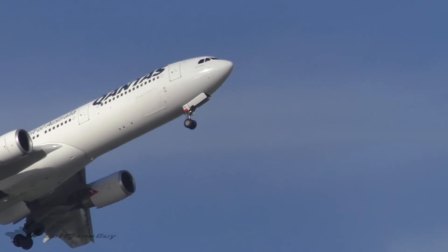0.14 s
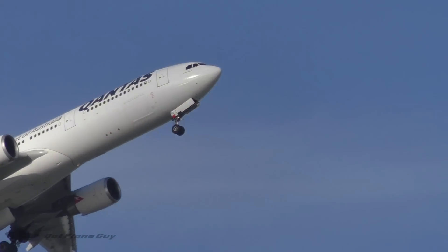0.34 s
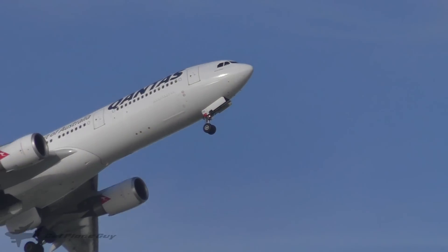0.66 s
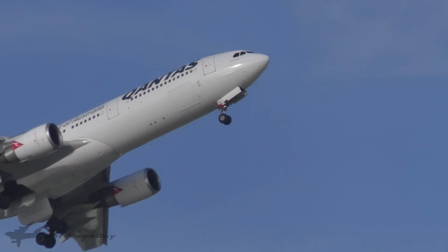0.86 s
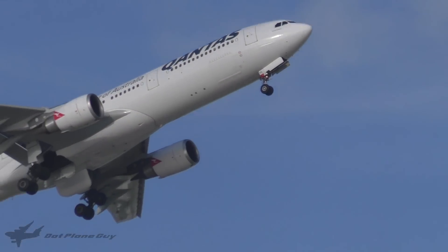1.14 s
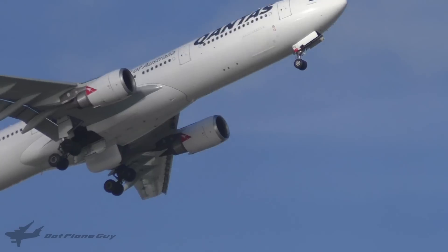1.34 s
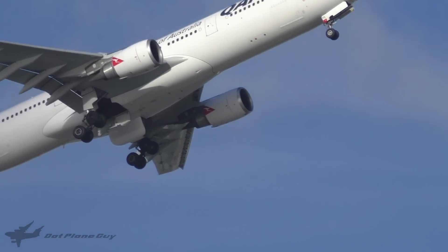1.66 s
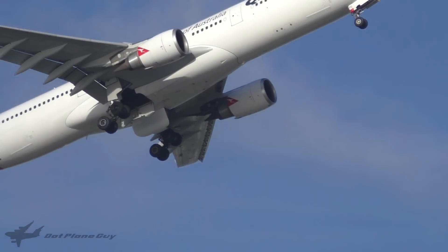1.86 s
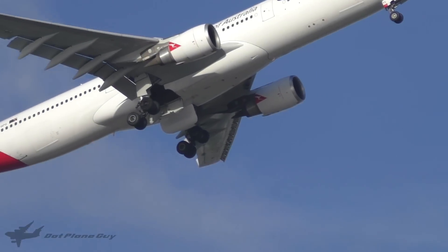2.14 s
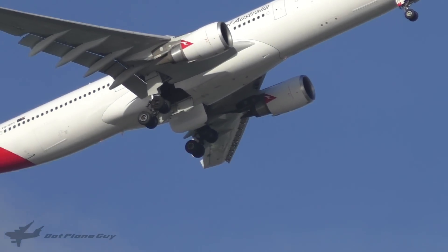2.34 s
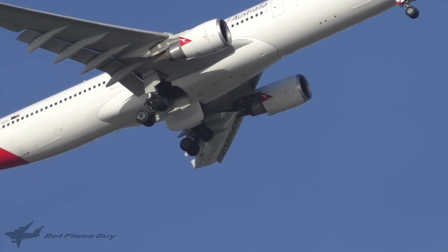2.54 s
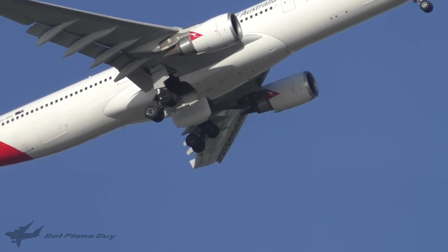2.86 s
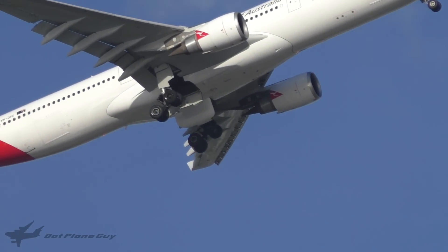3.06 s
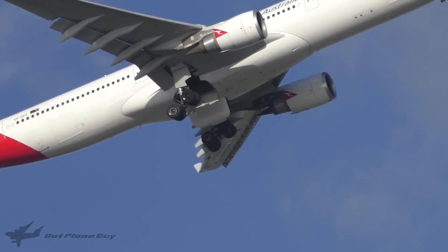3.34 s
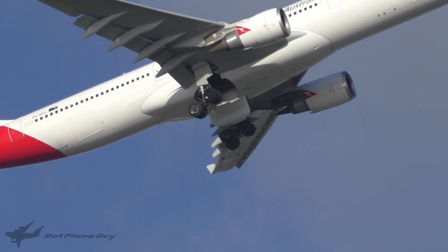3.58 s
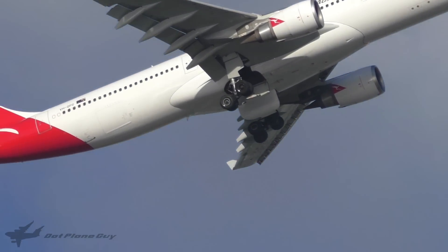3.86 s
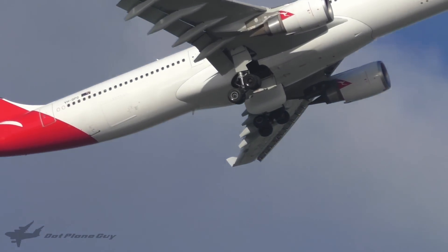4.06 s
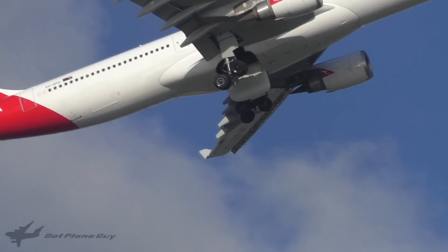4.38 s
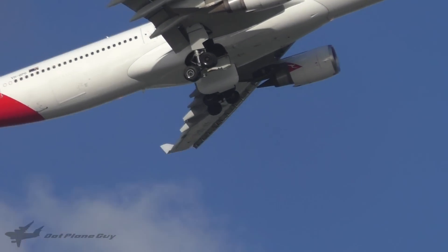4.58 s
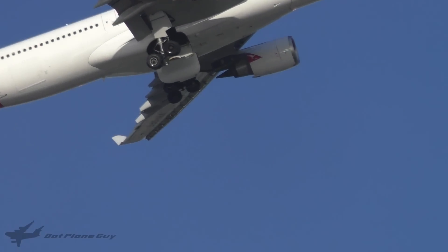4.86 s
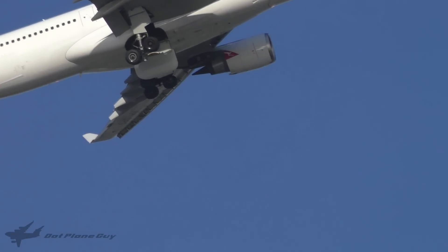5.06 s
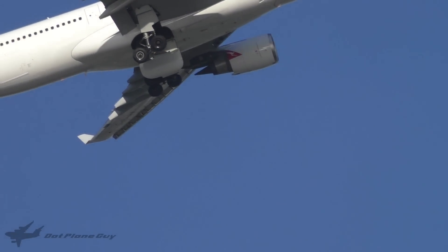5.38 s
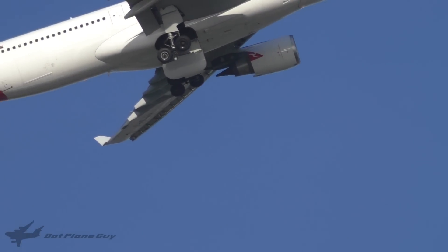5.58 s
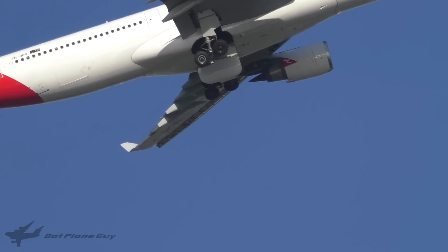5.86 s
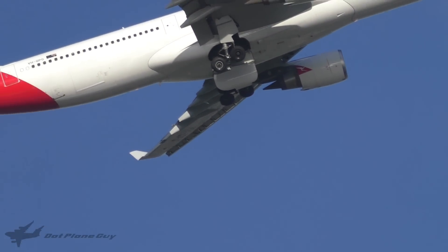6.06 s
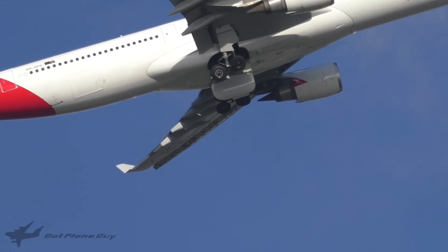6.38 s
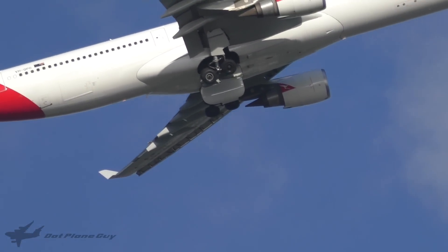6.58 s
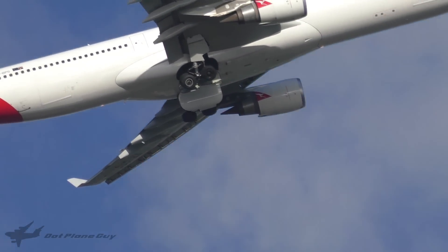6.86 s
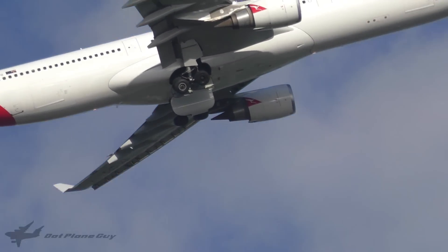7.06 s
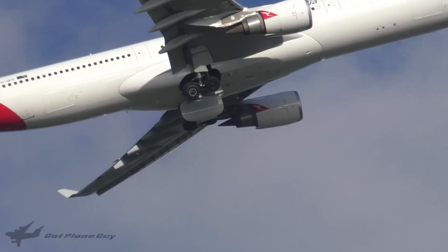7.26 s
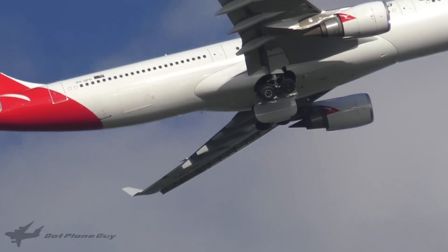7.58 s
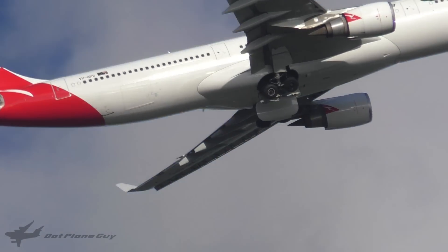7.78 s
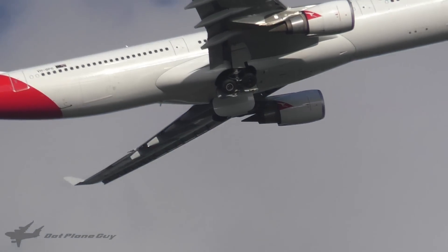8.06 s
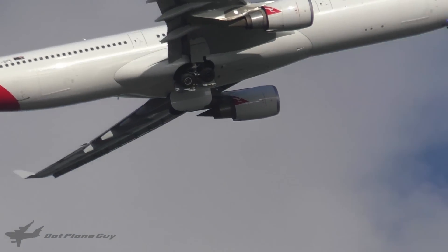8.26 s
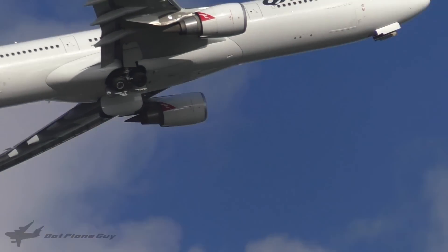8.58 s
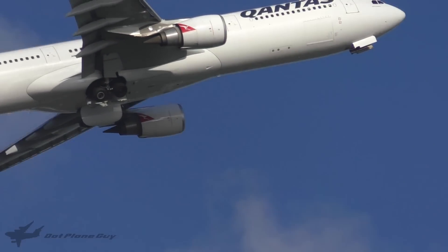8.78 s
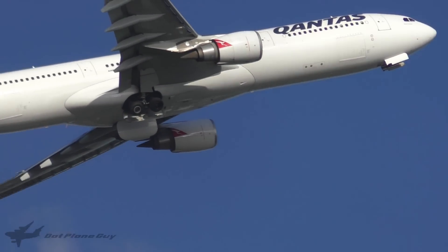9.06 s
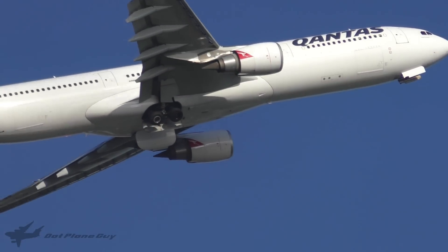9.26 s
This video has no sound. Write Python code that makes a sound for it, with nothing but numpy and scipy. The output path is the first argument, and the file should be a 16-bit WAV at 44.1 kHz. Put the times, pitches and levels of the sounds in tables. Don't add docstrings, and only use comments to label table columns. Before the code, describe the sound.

From 0 seconds a large twin-engined jet is already loud, climbing past a microphone on open ground. A deep, uneven drone around 100 hertz sits under a broad, dull exhaust roar. A thin fan whine near 2.4 kilohertz flickers through gusty air, bright around 0.5 seconds. The roar's body sags near 0.9 and more deeply near 2.2, while low rumbling heaves around 2.3 to 3. Very faint handling ticks occur before 3. From 2 to 5 the bass fills in, the drone recedes and the air clears, with a short heave at 3.5 and a whine glint at 4.8. From 6 to 8 hiss surges in patches and the whine, now sinking toward 2.1 kilohertz, flashes often, strongest around 7.1 and 7.6. A faint octave emerges after 7.5. The ground-reflected roar continues, brighter and open, to about 9.4 without stopping.

```python
import sys
import numpy as np
from scipy import signal
from scipy.fft import irfft, next_fast_len
from scipy.io import wavfile

SR = 44100
rng = np.random.default_rng(int(sys.argv[2]) if len(sys.argv) > 2 else 0)


def volts_from_decibels(level):
    exponent = np.asarray(level, float) / 20
    return 10 ** exponent


def generate_wav(sig):
    pcm = np.round(np.clip(np.atleast_2d(sig).T, -1, 1) * 32767).astype(np.int16)
    wavfile.write(sys.argv[1], SR, pcm)


N = 415863
SIZE = next_fast_len(N)

# frequency in Hz, density in dB per Hz.
EXHAUST_SPECTRUM = [(65, -33), (110, -3.5), (170, -0.5), (240, 1), (340, -3), (520, -7), (700, -11.5),
                    (1000, -13), (1500, -17), (2400, -23.5), (3550, -29.5), (3950, -38.5), (6000, -55),
                    (8400, -81.5)]
# peak time in seconds, length in seconds, lift in dB.
BODY_LULLS = [
    (.3, 0.36, 1.5),
    (.85, 0.81, -4.5),
    (1.6, .5, 0.5),
    (2.15, .75, -7),
    (3.55, 0.24, 4.5),
    (4.72, .45, -3),
    (5.62, 0.27, 2.5),
    (5.85, 0.33, -2),
]
# peak time in seconds, length in seconds, middle lift in dB, treble lift in dB.
CLEAR_AIR = [(0.06, 0.52, 6.5, 1.5), (0.55, 0.68, 5.5, 1), (0.95, 0.33, -1, 2.5), (1.22, 1.03, 4.5, 4.5),
             (1.63, 0.32, 6, 3.5), (2.57, 0.26, 3.5, 2.5), (2.59, 0.62, 5, 6.5), (2.92, 0.45, 3, 4),
             (3.31, 0.84, 2, 6.5), (3.75, 0.26, -1, 3.5), (3.79, 0.85, 6.5, 3), (4.29, 0.37, 3, 3.5),
             (4.56, 0.46, 4, 0), (4.68, 0.26, 2, 5.5), (4.85, 0.2, 7.5, 4.5), (5.0, 0.4, 6.5, 3.5),
             (5.17, 0.3, 3.5, 4.5), (5.58, 0.26, 5.5, 5.5), (5.81, 0.56, 7, 8.5), (6.24, 0.75, 3.5, 4),
             (6.84, 0.75, -0.5, 4.5), (7.02, 1.0, 6, -1.5), (7.12, 0.36, 1.5, 8), (7.53, 0.48, 2.5, 10.5),
             (7.69, 0.37, 3, -1), (7.93, 0.33, 0.5, 8), (8.2, 0.22, 0, 7), (8.56, 0.36, 7.5, 6.5),
             (8.79, 0.4, 4.5, 6.5), (9.22, 0.83, 3, 5.5)]
# time in seconds, slope above the treble in dB per octave.
AIR_SLOPE = [(0, -7.5), (2.3, -5), (3, -3), (4.5, 1.5), (9.43, 3)]
# time in seconds, frequency in Hz.
BLADE_TONE = [(0, 2448), (.6, 2472), (1.2, 2460), (1.6, 2445), (2.45, 2420), (3.3, 2384), (4.8, 2310),
              (5.8, 2248), (6.9, 2188), (7.5, 2165), (8, 2142), (8.6, 2105), (9.43, 2076)]
# time in seconds, level in dB re the tone.
BLADE_OCTAVE = [(0, -37), (7.2, -35), (7.6, -18), (8, -25), (8.7, -15), (9.0, -15.5), (9.43, -22)]
# peak time in seconds, length in seconds, lift in dB.
TONE_GLINTS = [(.13, .25, 13), (.28, .2, 9), (.43, .2, 12), (.56, .18, 18), (1.08, .2, 9), (1.2, .2, 14),
               (1.33, .2, 12.5), (1.61, 0.24, 14.5), (2.1, .5, 4), (2.46, 0.38, 17.5), (2.65, .2, 11.5),
               (2.95, 0.5, 10), (3.27, .2, 7), (3.7, .25, 12.5), (3.95, .35, 10), (4.6, .3, 9),
               (4.81, .17, 18), (5.75, .4, 14), (6.3, .3, 6.5), (6.62, .2, 11), (6.86, 0.38, 15.5),
               (7.12, 0.45, 19.5), (7.33, .15, 11), (7.45, .2, 14), (7.57, .2, 20.5), (7.92, 0.25, 18.5),
               (8.05, 0.15, 15), (8.56, 0.28, 15), (8.78, .36, 11.5), (9.35, .2, 10)]
# time in seconds, extra path in ms, strength 0-1, share of treble kept 0-1.
GROUND_BOUNCE = [(0, 1.77, 0.39, 0), (1, 2.04, 0.25, 0), (1.8, 2.52, 0.26, 0), (2.5, 2.3, 0.12, 0.06),
                 (3.7, 2.56, 0.17, 0), (4.2, 2.96, 0.3, 0), (5.2, 3.1, 0.25, 0.2), (6.3, 3.5, 0.34, 0.7),
                 (7.2, 3.6, 0.27, 0.75), (7.9, 4, 0.34, 0.9), (9.43, 4.24, 0.45, 0.6)]
# time in seconds, centre in Hz, level in dB.
DRONE_COURSE = [(0, 102, -21), (.25, 101, -16.5), (.7, 98, -24), (1.1, 97, -18), (1.5, 95, -18),
                (1.9, 93, -22.5), (2.15, 85, -23.5), (2.45, 80, -16.5), (2.72, 82, -30), (2.95, 85, -21.5),
                (3.42, 89, -18.5), (3.62, 86, -29.5), (4.6, 70, -30.5), (5.6, 75, -38.5), (6.5, 78, -25.5),
                (7.9, 80, -32), (8.45, 82, -27), (9.43, 85, -33.5)]
# frequency in Hz, density in dB per Hz.
SWELL_SPECTRUM = [(14, -20.5), (25, -6), (40, -3.5), (60, 2), (100, -2.5), (150, -8), (220, -33.5)]
# peak time in seconds, length in seconds, lift in dB.
EDDY_BILLOWS = [
    (.3, .35, 5),
    (1.2, 0.81, 3),
    (2.3, .7, 5),
    (2.95, 0.55, 7.5),
    (3.85, 0.97, -3),
    (4.68, .5, 5.5),
    (5.03, 0.27, 3),
    (6.4, .9, 2),
    (8.55, .45, -1.5),
]
# time in seconds, peak in dB, frequency in Hz.
HANDLING_TICKS = [(.325, -61, 6200), (.335, -78, 7900), (.855, -72, 7800), (.92, -65, 8000),
                  (.92, -69, 11800), (1.325, -73, 8060), (1.325, -75, 11700), (1.854, -70, 11900),
                  (2.117, -74, 8000), (2.245, -70, 8200), (2.245, -76, 10300), (2.245, -78, 13000),
                  (2.82, -71, 11200), (2.83, -58, 6400), (2.84, -70, 7900)]

BASS_HZ, LOW_HZ, MIDDLE_HZ, TREBLE_HZ, TOP_HZ = 160, 308, 1290, 4230, 7000
TOP_SHARE = 0.64
BASS_START_DB, BASS_FILL_DB, FILL_FROM_S, FILL_LENGTH_S = -3, 4, 1.7, 3.5
ROAR_DB, FAN_DULL_DB = -16.5, -49.5
SWELL_DB, SWELL_RISE_DB_PER_S = -28, 0.26
RISE_SHARE = 0.45
GATE_DB, GATE_WOBBLE_DB, GATE_FROM_HZ = -101, 5.5, 6400


def rms_one(x):
    return x / np.sqrt(np.mean(x ** 2) + 1e-20)


def in_time(rows):
    time_s, *columns = np.transpose(rows)
    return [np.interp(np.arange(N) / SR, time_s, column) for column in columns]


def humps(rows):
    rows = np.array(rows)
    time_s = np.arange(0, N + 64, 64) / SR
    ahead = (time_s - rows[:, :1]) / np.maximum(rows[:, 1:2], 0.05)
    phase = np.clip(ahead / np.where(ahead < 0, RISE_SHARE, 1 - RISE_SHARE), -1, 1)
    shape = np.cos(np.pi / 2 * phase) ** 2
    return [np.interp(np.arange(N) / SR, time_s, column) for column in rows[:, 2:].T @ shape]


def drift(rate_hz):
    pole = np.exp(-80 * np.pi * rate_hz / SR)
    coarse = rng.standard_normal(N // 40 + 2002)
    slow = signal.lfilter([1], [1, -2 * pole, pole * pole], coarse)[2000:]
    return np.interp(np.arange(N) / 40, np.arange(len(slow)), rms_one(slow))


def shaped_noise(spectrum, low_hz=10, high_hz=20000):
    hz = np.maximum(np.fft.rfftfreq(SIZE, 1 / SR), 1)
    points = np.array(spectrum)
    place = np.clip(np.log(hz / low_hz) / np.log(high_hz / low_hz), 0, 1)
    gain = volts_from_decibels(np.interp(np.log(hz), np.log(points[:, 0]), points[:, 1], left=-99, right=-120))
    white = rng.standard_normal(len(hz)) + 1j * rng.standard_normal(len(hz))
    return irfft(white * gain * np.sin(np.pi * place), SIZE)[:N]


def exhaust(shared_db, own_db):
    body_db, = humps(BODY_LULLS)
    middle_db, treble_db = humps(CLEAR_AIR)
    slope_db, = in_time(AIR_SLOPE)
    filled = np.clip((np.arange(N) / SR - FILL_FROM_S) / FILL_LENGTH_S, 0, 1)
    bass_db = 0.36 * body_db + BASS_START_DB + BASS_FILL_DB * filled
    levels_db = np.array([bass_db, body_db, 1.16 * middle_db, 1.12 * treble_db, TOP_SHARE * treble_db])
    swings_db = levels_db - levels_db.mean(axis=1, keepdims=True)
    anchors = np.log([BASS_HZ, LOW_HZ, MIDDLE_HZ, TREBLE_HZ, TOP_HZ])
    flutter = drift(14)
    roar = 0
    for hz in 80 * 2 ** np.arange(0, 7.1, 0.5):
        band = shaped_noise(EXHAUST_SPECTRUM, hz / np.sqrt(2), hz * np.sqrt(2))
        weights = np.array([np.interp(np.log(hz), anchors, corner) for corner in np.eye(len(anchors))])
        air_db = slope_db * max(np.log2(hz / 3300), 0)
        reach = np.sqrt(hz / TREBLE_HZ)
        twinkle_db = reach * (shared_db * flutter + own_db * drift(4.5))
        roar = roar + band * volts_from_decibels(weights @ swings_db + air_db + twinkle_db)
    return volts_from_decibels(ROAR_DB) * rms_one(roar)


def fan(scatter, level_db):
    blade_hz, = in_time(BLADE_TONE)
    octave_db, = in_time(BLADE_OCTAVE)
    glint_db, = humps(TONE_GLINTS)
    blades = 0
    for apart_hz, engine_db in ((-5, 0), (9, -8)):
        phase = 2 * np.pi * np.cumsum(blade_hz + apart_hz + 7 * drift(8)) / SR
        path = np.sqrt(1 - scatter) + np.sqrt(scatter / 2) * (drift(32) + 1j * drift(32))
        tone = np.exp(1j * phase) + volts_from_decibels(octave_db) * np.exp(2j * phase)
        blades = blades + volts_from_decibels(FAN_DULL_DB + glint_db + engine_db + level_db) * np.real(path * tone)
    return blades


def ground(x, soft_hz, grazing_hz, steep_hz):
    late_ms, strength, treble = in_time(GROUND_BOUNCE)
    strength, treble = np.clip(strength, 0, 1), np.clip(treble, 0, 1)
    dull, clear = (signal.sosfiltfilt(signal.butter(1, [soft_hz, hz], "band", fs=SR, output="sos"), x)
                   for hz in (grazing_hz, steep_hz))
    bounced = dull + treble * (clear - dull)
    late = np.interp(np.arange(N) - late_ms * SR / 1000, np.arange(N), bounced)
    return (x + strength * late) / np.sqrt(1 + 0.84 * strength ** 2)


def deep(width_hz, lumpy_db):
    centre_hz, drone_db = in_time(DRONE_COURSE)
    billow_db, = humps(EDDY_BILLOWS)
    phase = 2 * np.pi * np.cumsum(centre_hz) / SR
    drone = rms_one(drift(width_hz) * np.cos(phase) + drift(width_hz) * np.sin(phase))
    swell_db = SWELL_DB + SWELL_RISE_DB_PER_S * np.arange(N) / SR + billow_db
    swell = rms_one(shaped_noise(SWELL_SPECTRUM, 5, 900))
    return volts_from_decibels(lumpy_db * drift(3.7)) * (volts_from_decibels(drone_db) * drone + volts_from_decibels(swell_db) * swell)


def ticks(length_s):
    out = np.zeros(N)
    time_s = np.arange(round(length_s * SR)) / SR
    count = len(time_s)
    for at_s, peak_db, hz in HANDLING_TICKS:
        start = round((at_s - length_s / 2) * SR)
        wobble = np.cumsum(rng.normal(0, 0.2, 2000))[:count]
        ring = np.sin(2 * np.pi * hz * time_s + wobble)
        out[start:start + count] += volts_from_decibels(peak_db) * np.hanning(count) * ring
    return out


def band_gate(x):
    hz, _, frames = signal.stft(x, SR, nperseg=2048)
    power = np.abs(frames[:1024].reshape(64, 16, -1)) ** 2
    count = frames.shape[1]
    jumps = 0.45 * rng.standard_normal(count) + 0.8 * rng.standard_normal((64, count))
    limit = volts_from_decibels(GATE_DB + GATE_WOBBLE_DB * jumps) ** 2
    weak = np.repeat(power.mean(axis=1) < limit, 16, axis=0)
    frames[:1024][weak & (hz[:1024, None] > GATE_FROM_HZ)] = 0
    return signal.istft(frames, SR, nperseg=2048)[1][:N]


def scene():
    roar = ground(exhaust(shared_db=0.5, own_db=1.5), soft_hz=90, grazing_hz=1050, steep_hz=2800)
    blades = fan(scatter=0.4, level_db=2)
    return (roar + blades + deep(width_hz=23.5, lumpy_db=-0.35) + ticks(length_s=0.022))[None]


def low_pass(x):
    return signal.sosfilt(signal.butter(12, 14000, fs=SR, output="sos"), x)


def record(dry):
    rounded = 1.512 * np.tanh(dry[0] / 1.464)
    mix = band_gate(rounded)[None]
    return low_pass(mix)


dry = scene()
out = record(dry)
generate_wav(out)
```